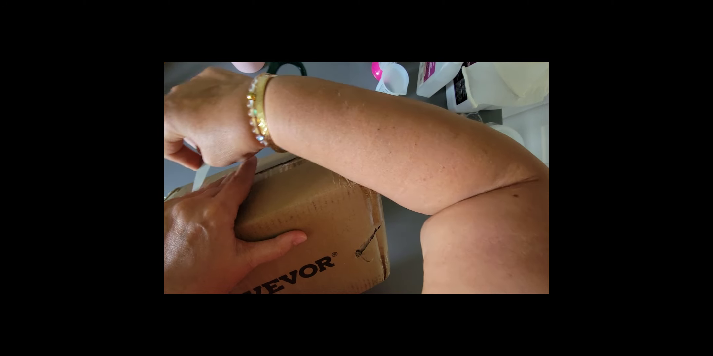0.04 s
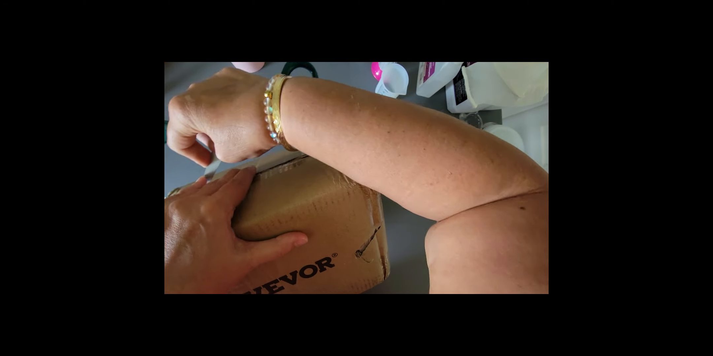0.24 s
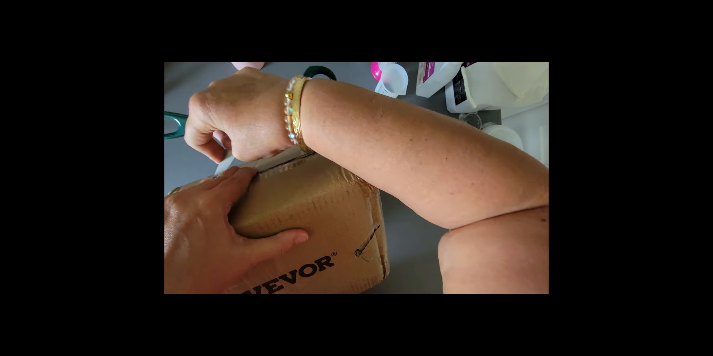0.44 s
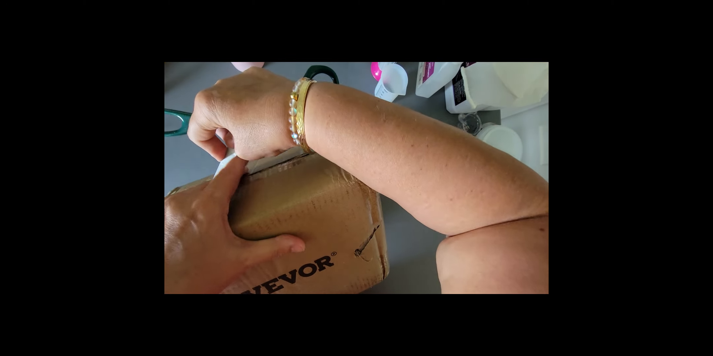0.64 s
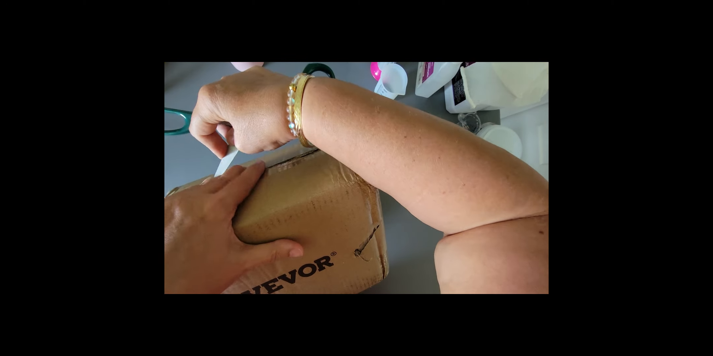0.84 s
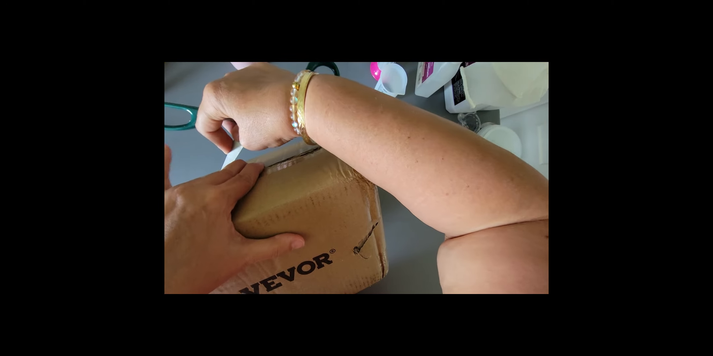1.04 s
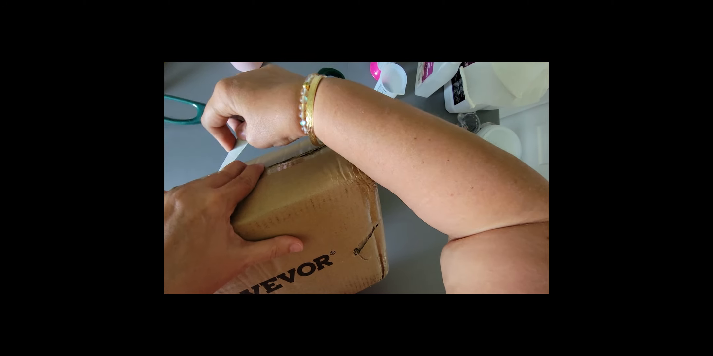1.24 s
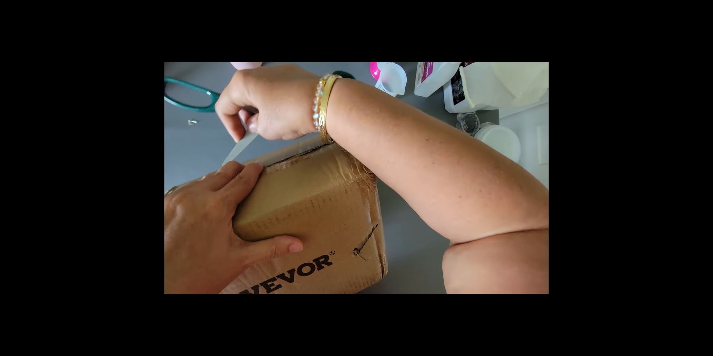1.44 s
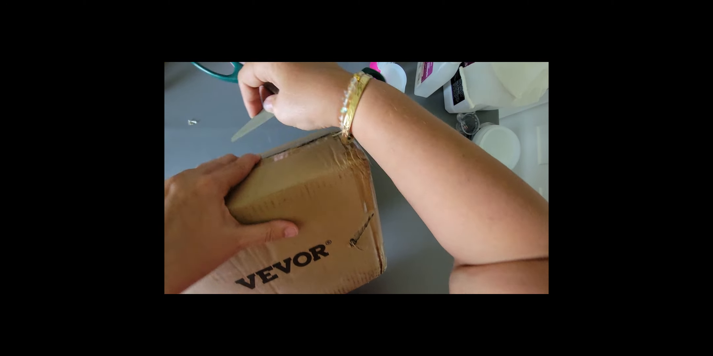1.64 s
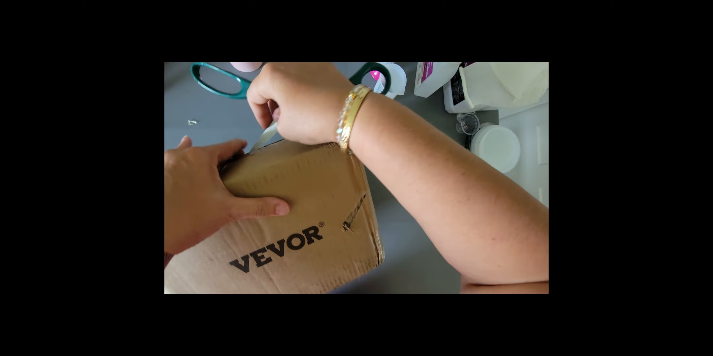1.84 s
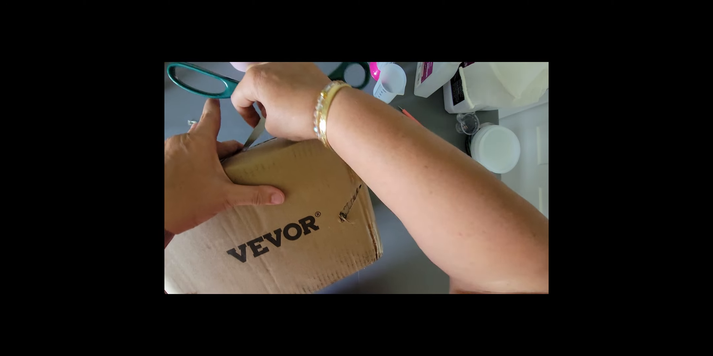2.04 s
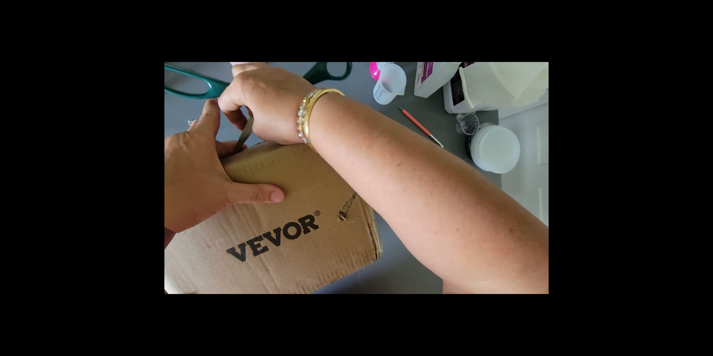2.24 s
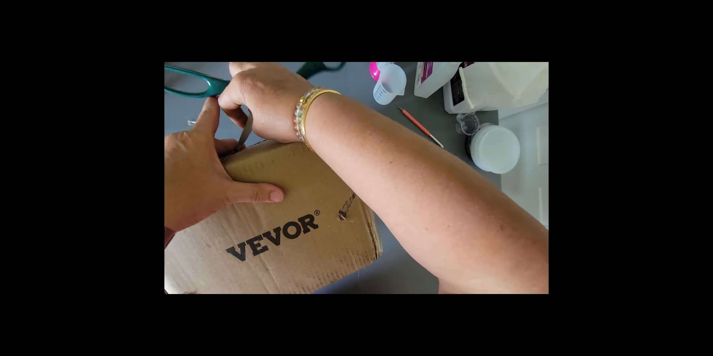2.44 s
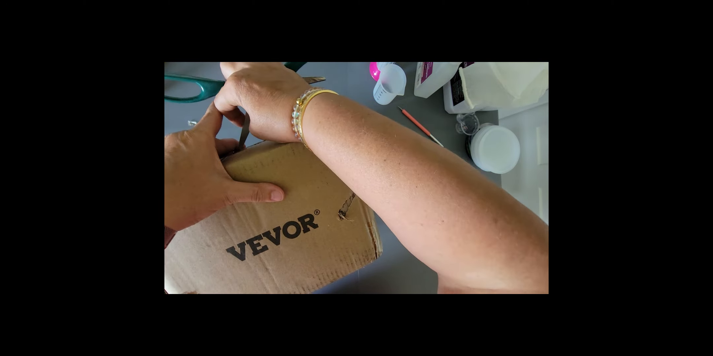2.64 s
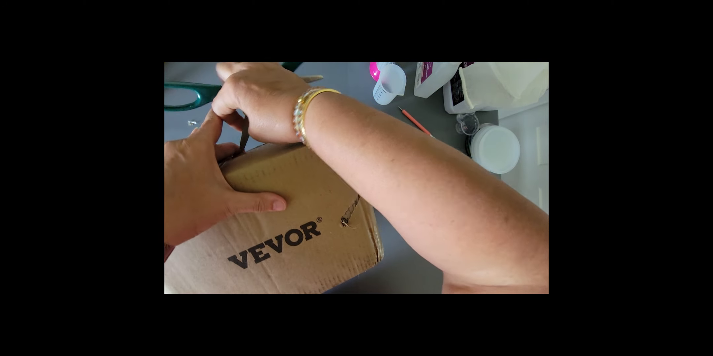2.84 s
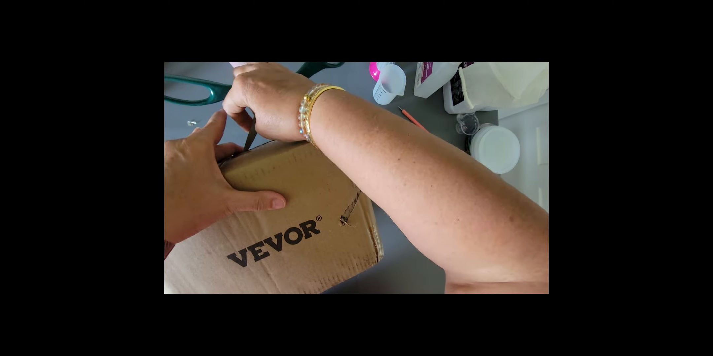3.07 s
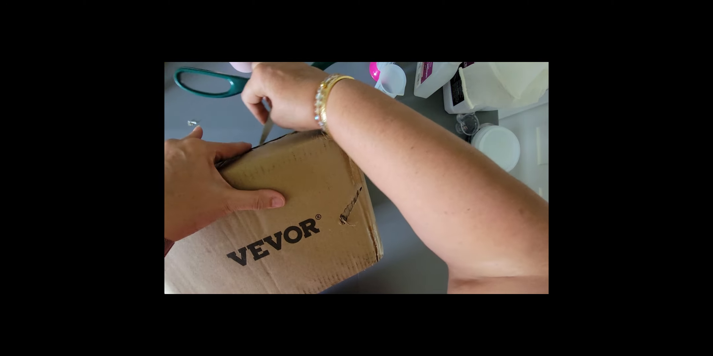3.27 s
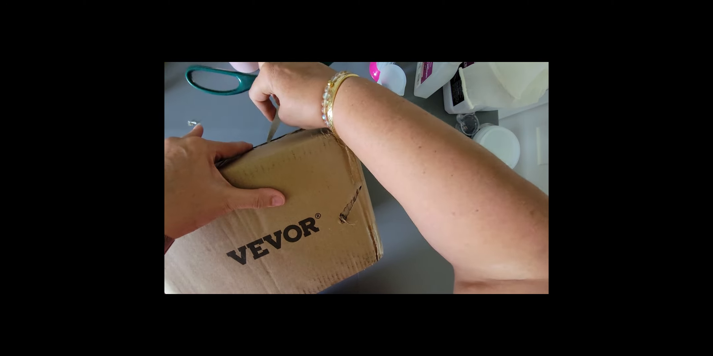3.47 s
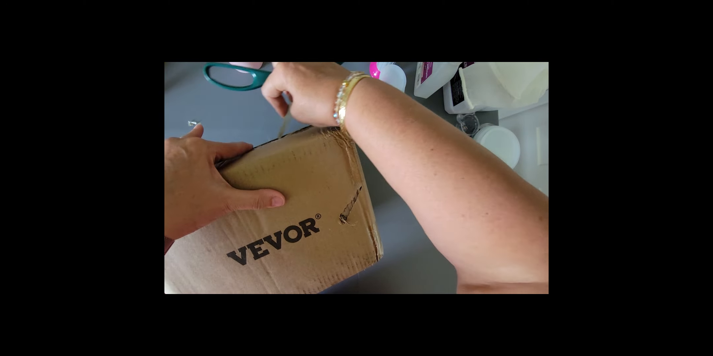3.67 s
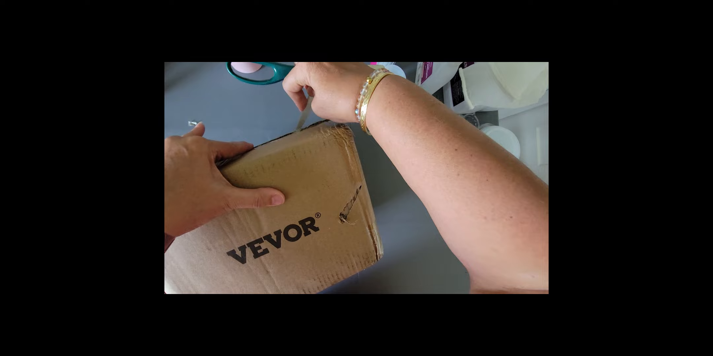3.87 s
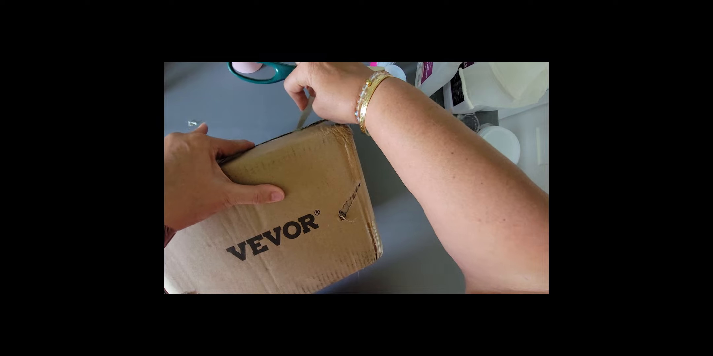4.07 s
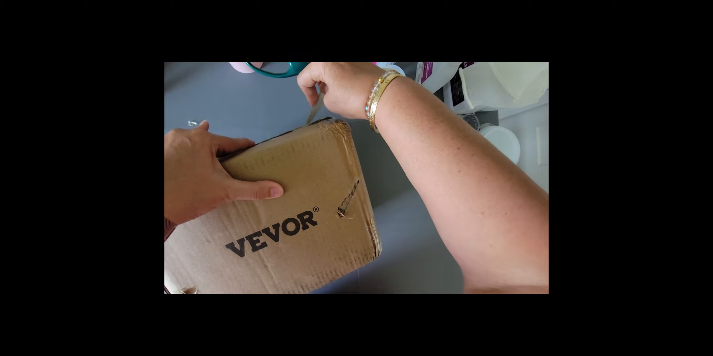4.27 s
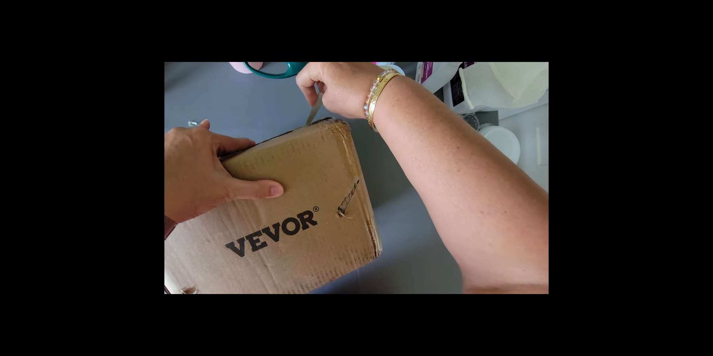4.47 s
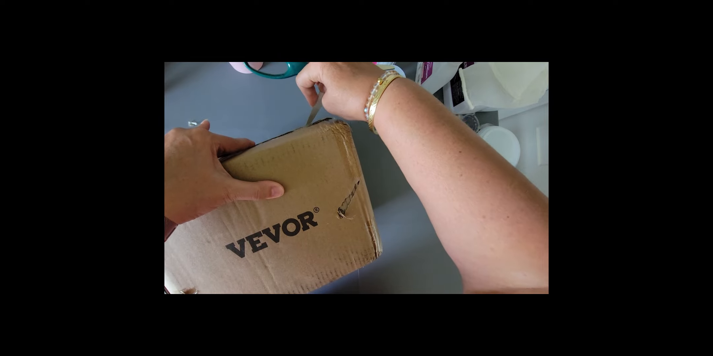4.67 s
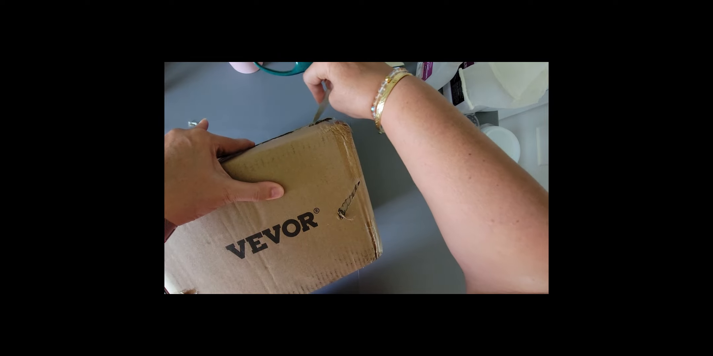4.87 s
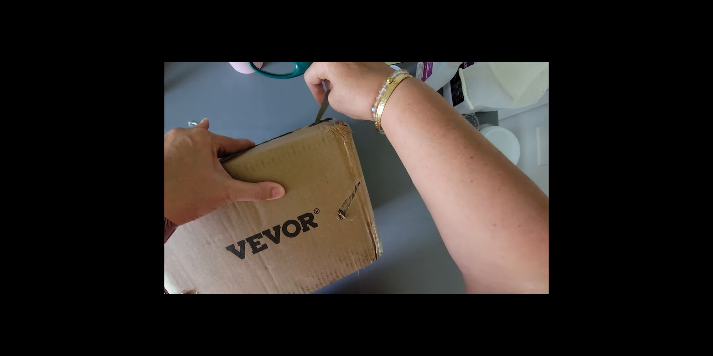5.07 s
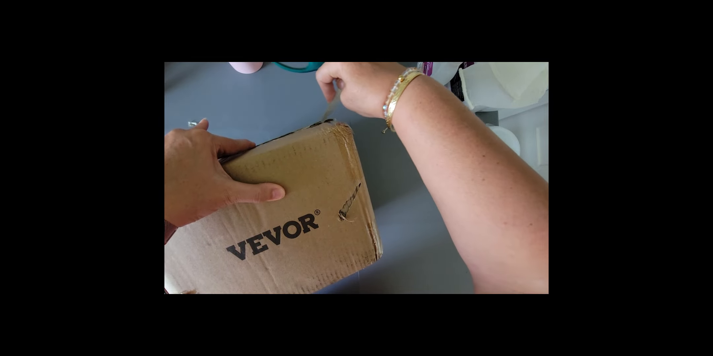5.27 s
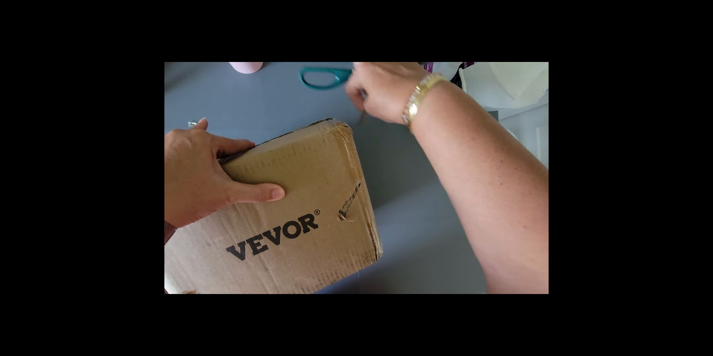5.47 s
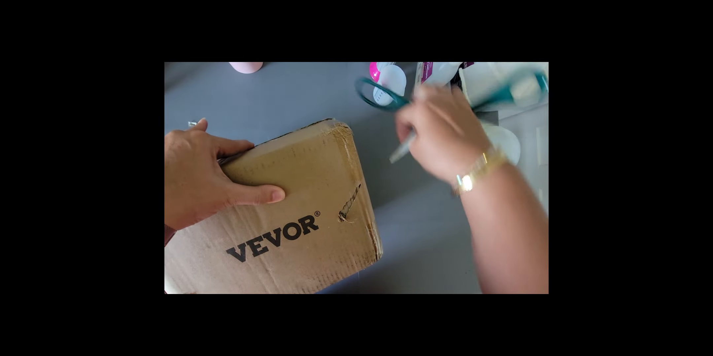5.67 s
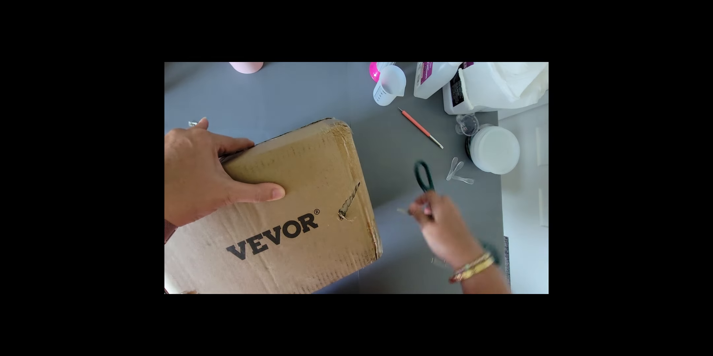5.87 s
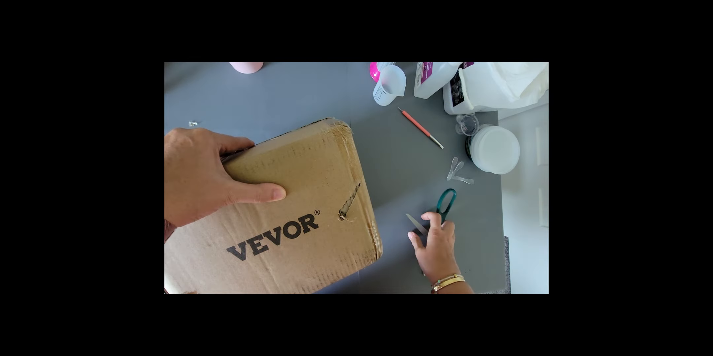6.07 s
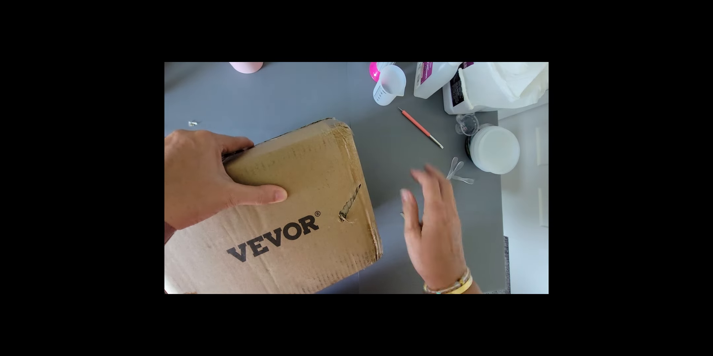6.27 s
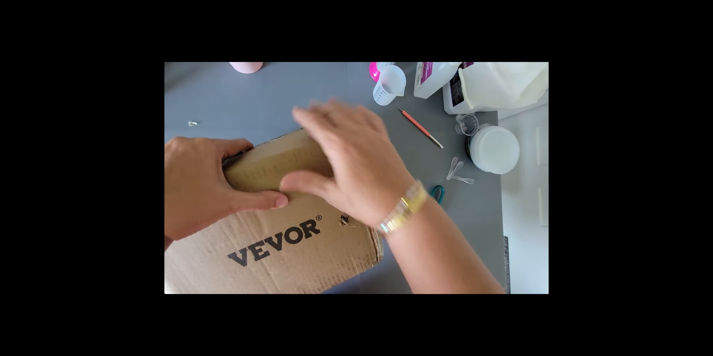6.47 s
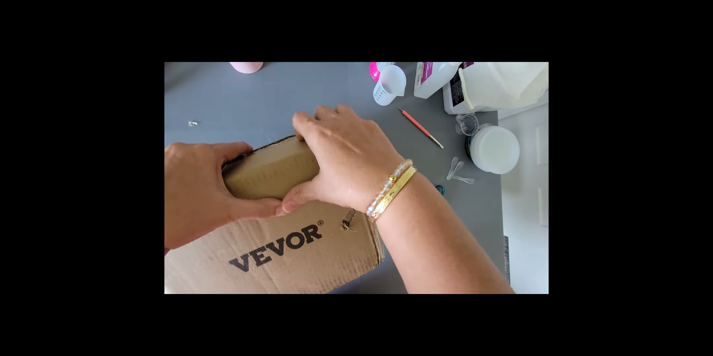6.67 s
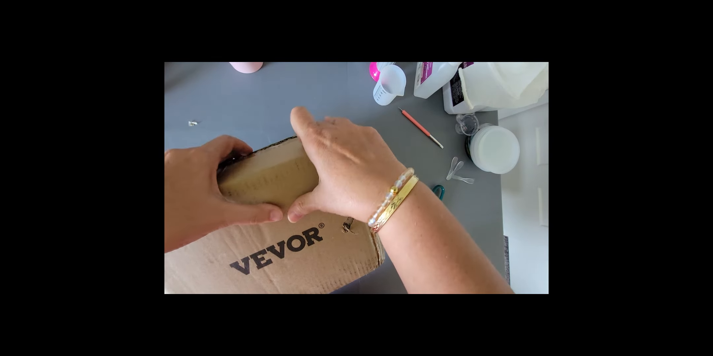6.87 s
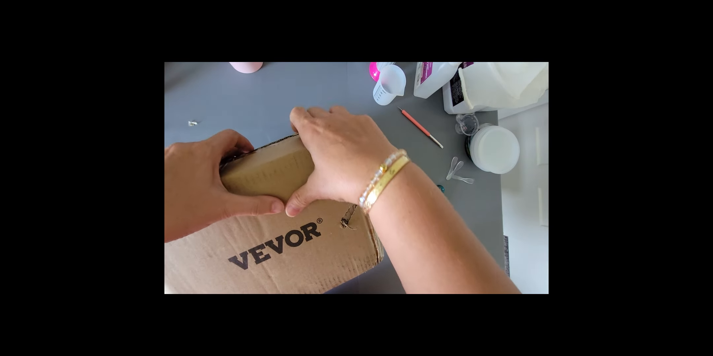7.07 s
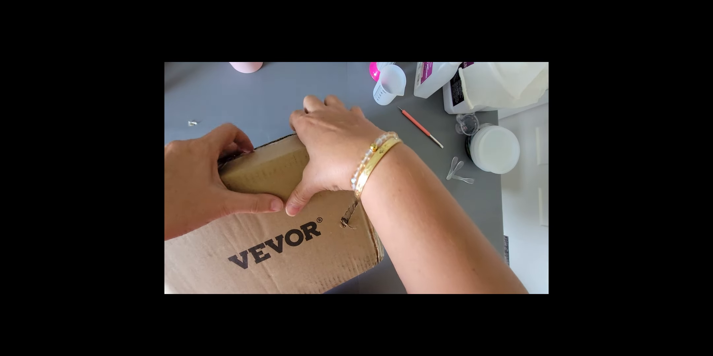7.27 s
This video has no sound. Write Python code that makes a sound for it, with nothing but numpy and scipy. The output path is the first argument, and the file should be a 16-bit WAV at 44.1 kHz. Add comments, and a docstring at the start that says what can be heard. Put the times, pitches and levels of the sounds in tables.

```python
"""A cardboard box on a table in a small room, heard close on a stereo pair over a low rumble.
A little to the left, a scissor blade works along the taped seam: it rasps and creaks through the board,
tape and fibres snap, and the panels flex and thump. At 6 s the scissors drop on the table to the right
and bounce with a steel clatter. Then, on the left again, hands rub and grip the box."""
import sys
import numpy as np
from scipy import signal
from scipy.fft import rfft, irfft
from scipy.io import wavfile
from scipy.ndimage import uniform_filter1d

SR = 44100
rng = np.random.default_rng(int(sys.argv[2]) if len(sys.argv) > 2 else 0)


def output_pcm(signal):
    """Save a mono or channel-first signal as 16-bit PCM at the path in sys.argv[1].

    Samples are clipped to [-1, 1] before scaling.
    """
    pcm = np.clip(np.atleast_2d(signal).T, -1, 1) * 32767
    wavfile.write(sys.argv[1], SR, np.round(pcm).astype(np.int16))


N = 322720
TIME = np.arange(N) / SR

# spectrum of the room tone: f/Hz, level/dB
ROOM_TONE_SPECTRUM = [(20, -6.5), (45, -5.5), (62, 4.5), (105, -1.5), (160, -16.5), (260, -16.5),
                      (360, -15.5), (550, -22.5), (1000, -27.5), (2000, -32.5), (4000, -36.5), (9000, -49),
                      (16000, -47)]
# decay of the room: f/Hz, t60/s
ROOM_T60 = [(100, 0.19), (350, 0.29), (1000, 0.22), (4000, 0.27), (9000, 0.23), (15000, 0.2)]

# handles and blades landing on the table: t/s, clash level/dB, knock level/dB
BOUNCES = [(6.008, -62, -49.5), (6.0223, -33, -36), (6.0715, -32, -25.5), (6.0918, -30.5, -31),
           (6.1256, -33, -38), (6.164, -30.5, -15), (6.1777, -29, -20), (6.1861, -26, -35.5),
           (6.2019, -30, -34.5), (6.2354, -32, -28)]
# spectra of the steel's clash and the table's knock: f/Hz, level/dB
CLASH_SPECTRUM = [(800, 8.5), (2000, -15.5), (2800, -2), (4200, -3.5), (5200, -2.5), (8500, 1), (10300, -4),
                  (13000, 1.5), (16000, -6)]
TABLE_SPECTRUM = [(50, -23), (110, 4.5), (230, -7.5), (340, 5), (480, -0.5), (680, -5.5), (850, 0.5),
                  (1000, -1), (1300, 0), (1700, -6.5), (2300, -9.5), (5000, -21)]
# clusters of close steel modes that colour the clash: f/Hz, width/Hz, level/dB
CLASH_CLUSTERS = [(2570, 230, 5), (4300, 170, 5.5)]
# modes of the free steel blades, and of scissors and table top together: f/Hz, level/dB, t60/s
STEEL_MODES = [(2500, -2.5, .2), (2720, 5.5, 0.13), (4306, -0.5, 0.26), (5760, -1, 0.16), (7343, -15, .25),
               (12860, -5, .18)]
TABLE_MODES = [(250, 8.5, 0.058), (338, 10, 0.1), (556, -14.5, 0.18), (735, -9.5, 0.13), (801, -3, 0.18),
               (1140, 2.5, 0.08), (1437, -8.5, 0.24), (1570, -12, 0.16), (1737, -6, 0.19), (1897, -9, 0.33)]

# fingers shifting on the taped box: from t/s, to t/s
HANDLING = [(.45, 1.55), (6.6, 7.25)]
# the blade slipping between tight board edges: t/s, slip level/dB, f/Hz
CREAKS = [(0.65, -38, 730), (1.535, -41.5, 615), (1.648, -34.5, 666), (1.685, -37, 910), (1.886, -29, 950),
          (1.91, -30.5, 930), (2.119, -45, 400), (2.158, -33.5, 440), (2.24, -34.5, 876), (2.444, -40, 603)]
# the blade or a hand sliding on the box: t/s, length/s, hiss level/dB, rasp level/dB
STROKES = [(0, 0.014, -50, -40), (0.155, 0.18, -57.5, -50), (0.484, 0.23, -69.5, -63),
           (1.128, 0.2, -71, -84), (1.515, 0.53, -70.5, -58), (2.091, 0.17, -71, -53.5),
           (2.394, 0.074, -69.5, -48.5), (2.681, 0.029, -55.5, -42), (2.973, 0.036, -61.5, -51),
           (3.121, 0.18, -50, -43), (3.494, 0.29, -59.5, -48.5), (4.079, .13, -59, -57),
           (4.769, 0.085, -58.5, -50.5), (5.002, 0.02, -58.5, -48), (5.233, 0.075, -55.5, -49),
           (5.385, 0.054, -46, -44), (6.461, 0.074, -54, -50.5), (6.586, 0.17, -62.5, -57),
           (6.959, 0.032, -48.5, -52.5), (7.242, 0.078, -70, -49)]
# tape and single fibres snapping: t/s, crack level/dB, tick level/dB, knock level/dB
SNAPS = [(0.1628, -45.5, -43.5, -53), (.193, -30, -42, -42.5), (0.335, -37, -46, -37.5),
         (0.649, -52, -52, -56), (.959, -48.5, -58, -42.5), (2.697, -38, -47, -40), (1.778, -52, -54, -51),
         (3.271, -39, -64, -30.5), (3.537, -36.5, -56, -33), (3.639, -52.5, -55, -39),
         (5.2014, -48.5, -55, -59), (5.3445, -35, -70, -33), (5.435, -38.5, -54, -35),
         (6.804, -37.5, -59, -44), (7.255, -45.5, -68.5, -51)]
# the board giving way under the blade or a hand: t/s, tear length/s, crack level/dB, tick level/dB,
# blade level/dB, knock level/dB, thump level/dB, panel f/Hz
BREAKS = [(.829, 0.0014, -44, -56, -72, -35.5, -22.5, 138), (1.842, .003, -42, -72, -51, -28, -26, 150),
          (3.212, 0.0061, -33.5, -50, -44, -28.5, -22.5, 118),
          (3.3, 0.0022, -39, -57, -50, -33.5, -19, 184), (3.674, .006, -47, -50.5, -58, -38, -26, 160),
          (3.7929, .002, -32, -37.5, -56, -25.5, -26.5, 192),
          (3.8316, 0.0015, -43.5, -46, -54, -26.5, -26, 93.5),
          (4.15, 0.0042, -34.5, -38.5, -47, -28, -17.5, 143),
          (4.202, 0.0074, -40, -46, -44, -26.5, -14, 186.5), (4.799, 0.0026, -49, -52, -40, -41, -22, 197),
          (4.945, 0.0049, -53, -59.5, -44, -37, -25.5, 147), (5.273, 0.011, -45, -48.5, -39, -33, -24, 222),
          (5.4039, 0.0034, -29, -46, -31, -25.5, -22, 138), (6.488, 0.0053, -42, -62, -54, -33, -18, 86),
          (6.735, .003, -56, -59, -67, -48, -23.5, 192)]
# spectra of the edge's hiss, the board's rasp, a crack and the tape film's tick: f/Hz, level/dB
HISS_SPECTRUM = [(700, -2.5), (2000, 3), (3000, -1.5), (4200, 0), (5200, -3.5), (8000, -6), (11000, -14),
                 (16000, -15)]
RASP_SPECTRUM = [(50, -17.5), (110, 8), (190, 4.5), (280, 1.5), (380, 4), (520, -3), (750, -4),
                 (1100, -6.5), (1700, -9.5), (2600, -23), (6000, -45)]
CRACK_SPECTRUM = [(600, -23.5), (1500, 3.5), (2100, -3), (2850, -4.5), (3400, -4.5), (4200, -5),
                  (5200, -8.5), (9000, -22.5), (14000, -34)]
TICK_SPECTRUM = [(3000, -25), (6000, 0), (10000, -5.5), (14000, -6), (19000, -16)]
# modes of the box, and of the cutting blade damped by the hand: f/Hz, level/dB, t60/s
BOX_MODES = [(349.3, 1, 0.044), (539, -11.5, 0.11), (756, -11, 0.092), (780, 6.5, 0.0062),
             (1100, 3.5, 0.014), (1500, 9, 0.001), (1640, 7, 0.0034)]
HELD_BLADE_MODES = [(2745, -1, 0.044), (4080, -29, .035), (5340, -10, 0.023)]
# resonance of the box's hollow: f/Hz, width/Hz, level/dB
HOLLOW = (330, 14, 1)


def from_db(db):
    """Decibels to gain."""
    return 10 ** (np.asarray(db) / 20)


def unit_rms(x):
    """Scale to unit rms."""
    return x / np.sqrt(np.mean(x ** 2) + 1e-20)


def at_hz(points, hz):
    """Read a table on a log-frequency axis."""
    freq, value = np.transpose(points)
    return np.interp(np.log(np.maximum(hz, 1)), np.log(freq), value)


def fade(t, t60):
    """Exponential decay by 60 dB in t60 seconds."""
    return np.exp(-np.log(1000) * t / t60)


def damped_sine(t, hz, t60):
    """One mode ringing out."""
    return np.sin(2 * np.pi * hz * t) * fade(t, t60)


def add(track, s, sound):
    """Mix a sound into a track from s seconds on."""
    start = max(round(s * SR), 0)
    track[start:start + len(sound)] += sound[:N - start]


def low_cut(x, hz, order):
    """Roll off everything below hz."""
    return signal.sosfilt(signal.butter(order, hz, "high", fs=SR, output="sos"), x)


def colour(x, spectrum, size=4096):
    """Minimum-phase filter with the spectrum's shape; white noise keeps its power."""
    gain = unit_rms(from_db(at_hz(spectrum, np.fft.rfftfreq(size, 1 / SR))))
    cepstrum = irfft(np.log(gain))[:size // 2]
    cepstrum[0] /= 2
    response = irfft(np.exp(rfft(2 * cepstrum, size)))
    return signal.oaconvolve(x, response)[:N]


def resonate(x, hz, width_hz, db):
    """A single resonance with a gain of db at its peak."""
    radius = np.exp(-np.pi * width_hz / SR)
    feed = np.array([1, 0, -1]) * (1 - radius ** 2) / 2
    feedback = [1, -2 * radius * np.cos(2 * np.pi * hz / SR), radius ** 2]
    return from_db(db) * signal.lfilter(feed, feedback, x + 1e-18)


def drift(per_s):
    """Random wandering with unit rms."""
    knots = np.arange(0, N / SR + 1, 1 / per_s)
    return unit_rms(np.interp(TIME, knots, rng.standard_normal(N)[:len(knots)]))


def burst(t60, tail_db, tail_t60, size=16384):
    """A sharp spray of tiny contacts with a weaker, longer tail."""
    t = TIME[:size]
    return rng.standard_normal(size) * (fade(t, t60) + from_db(tail_db) * fade(t, tail_t60))


def strike(modes, spread_db, detune, size=16384):
    """One blow on a body: the contact point changes each mode's strength, sign and pitch."""
    hz, db, t60 = np.transpose(modes)[:, :, None]
    strength = from_db(db + spread_db * rng.standard_normal(hz.shape)) * rng.choice([-1, 1], hz.shape)
    pitch = hz * (1 + detune * rng.standard_normal(hz.shape))
    return np.sum(strength * damped_sine(TIME[:size], pitch, t60), axis=0)


def direct_at_mics(x, left_lead_s, left_db):
    """The nearer microphone hears a source earlier and louder."""
    lead = round(left_lead_s * SR / 2)
    return np.array([from_db(left_db / 2) * np.roll(x, -lead), from_db(-left_db / 2) * np.roll(x, lead)])


def diffuse_at_mics(mid, side):
    """Diffuse bass reaches both microphones alike; the treble is wide."""
    side = low_cut(side, hz=480, order=1)
    return np.array([mid + side, mid - side]) / np.sqrt(2)


def room_tone():
    """A steady low rumble all around the microphones."""
    mid, side = (colour(noise, ROOM_TONE_SPECTRUM) for noise in rng.standard_normal((2, N)))
    return from_db(-56) * diffuse_at_mics(mid, side)


def early_reflections(size, count=4):
    """Near surfaces: a chain of allpass echoes smears a sound without colouring it."""
    hz = np.fft.rfftfreq(size, 1 / SR)
    delays_s = rng.uniform(0.0006, 0.0035, (count, 1))
    echo = np.exp(-2j * np.pi * hz * delays_s)
    allpasses = (echo - 0.6) / (1 - 0.6 * echo)
    return irfft(echo[0] * np.prod(allpasses, axis=0))


def room(x, tail_db, early_db, size=24576):
    """The small room answers with early reflections and a short tail, each octave at its own decay."""
    t, centres_hz = TIME[:size], 125 * 2. ** np.arange(8)
    octave = np.log2(np.maximum(np.fft.rfftfreq(size, 1 / SR), 1))
    white = rfft(rng.standard_normal((2, size)))
    tail = np.zeros((2, size))
    for hz, share in zip(centres_hz, np.eye(len(centres_hz))):
        band = irfft(white * np.interp(octave, np.log2(centres_hz), share))
        tail += band * fade(t, at_hz(ROOM_T60, hz))
    build_up = 1 - fade(t, t60=0.28)
    tail = unit_rms(tail * build_up) / np.sqrt(size)
    early = np.array([early_reflections(size), early_reflections(size)])
    response = from_db(tail_db) * tail + from_db(early_db) * early
    return diffuse_at_mics(*signal.oaconvolve(x[None], response, axes=1)[:, :N])


def tape_crinkles(per_s=22, count=200):
    """The tape ticks faintly at random while the fingers shift; the thin film radiates only treble."""
    ticks, t = np.zeros(N), TIME[:1024]
    times = np.cumsum(rng.exponential(1, count)) / per_s
    levels_db = rng.normal(-57, 2, count)
    for s, db, spray in zip(times, levels_db, rng.standard_normal((count, len(t)))):
        if any(start < s < end for start, end in HANDLING):
            add(ticks, s, from_db(db) * spray * fade(t, t60=0.008))
    return low_cut(ticks, hz=3930, order=2)


def board_creaks(slips_per_creak=3, max_gap_s=0.002115, pitch_spread=0.16):
    """A creak is a few quick slips, each flicking the board's edge and sounding the hollow."""
    slips, t = np.zeros(N), TIME[:2048]
    for s, db, hz in CREAKS:
        for delay in np.cumsum(rng.uniform(0, max_gap_s, slips_per_creak)):
            pitch = hz * np.exp(pitch_spread * rng.standard_normal())
            add(slips, s + delay, from_db(db) * damped_sine(t, pitch, t60=0.0073))
    return slips + resonate(slips, HOLLOW[0], width_hz=17, db=9.5)


def fibre_friction(per_s, spread_db, clump_db, smooth_db):
    """Fibres catch at random, in clumps, over smooth friction noise; loudness is evened over 25 ms."""
    sizes = from_db(spread_db * np.minimum(rng.exponential(1, N), 4)) * rng.choice([-1, 1], N)
    catches = unit_rms(sizes * (rng.random(N) < per_s / SR))
    smooth = from_db(smooth_db) * rng.standard_normal(N)
    rough = (catches + smooth) * from_db(clump_db * drift(per_s=130))
    local_power = uniform_filter1d(rough ** 2, size=1100)
    return rough / np.sqrt(local_power + 1e-9)


def scraping(attack_share=0.19):
    """Each stroke takes hold, holds and lets go, hissing at the edge and rasping through the board."""
    hiss, rasp = np.zeros((2, N))
    t = TIME[:SR]
    for s, length, hiss_db, rasp_db in STROKES:
        attack = np.minimum(t / (attack_share * length), 1) ** 2
        push = attack * fade(np.maximum(t - length, 0), t60=0.056)
        add(hiss, s, from_db(hiss_db) * push)
        add(rasp, s, from_db(rasp_db) * push)
    for s, *_, knock_db, _, _ in BREAKS:
        add(rasp, s, from_db(knock_db - 5) * fade(t, t60=0.03))   # the skid after a break
    hiss *= fibre_friction(per_s=710, spread_db=3.5, clump_db=7, smooth_db=-1.5)
    rasp *= fibre_friction(per_s=460, spread_db=5.5, clump_db=13, smooth_db=0.5)
    edge, board = colour(hiss, HISS_SPECTRUM), colour(rasp, RASP_SPECTRUM)
    blade = resonate(edge, HELD_BLADE_MODES[0][0], width_hz=250, db=-9)
    return edge + board + blade + resonate(board, *HOLLOW)


def snapping(size=6144):
    """Each break or snap tears with a crack and a thin tick, knocks the board and rings the blade."""
    cracks, ticks, knocks, blade = np.zeros((4, N))
    t = TIME[:size]
    lead_in = from_db(-15.5) * fade(t[:1024], t60=0.049)[::-1]
    knock_rise = 1 - fade(t, t60=0.0048)
    fractures = [row[:6] for row in BREAKS]
    # a snap tears at once and barely rings the blade
    fractures += [(s, 0.0011, db, tick_db, db - 19, knock_db) for s, db, tick_db, knock_db in SNAPS]
    for s, tear_s, crack_db, tick_db, blade_db, knock_db in fractures:
        tear = np.concatenate([lead_in, fade(np.maximum(t - tear_s, 0), t60=0.0097)])
        start = s - len(lead_in) / SR
        add(cracks, start, from_db(crack_db) * tear * rng.standard_normal(len(tear)))
        add(ticks, start, from_db(tick_db) * tear * rng.standard_normal(len(tear)))
        knock = strike(BOX_MODES, spread_db=0, detune=0.038, size=size)
        ring = strike(HELD_BLADE_MODES, spread_db=1.5, detune=0.0067, size=size)
        add(knocks, s, from_db(knock_db) * knock * knock_rise)
        add(blade, s, from_db(blade_db) * ring)
    return colour(cracks, CRACK_SPECTRUM) + colour(ticks, TICK_SPECTRUM) + knocks + blade


def panel_thumps(lag_s=0.00341):
    """Just after each break the panel and the whole box swing a few cycles and sound the hollow."""
    swings, t = np.zeros(N), TIME[:8192]
    whole_box = from_db(-16.5) * damped_sine(t, hz=105, t60=0.06)
    rise = 1 - fade(t, t60=0.002)
    for s, *_, db, hz in BREAKS:
        panel = damped_sine(t, hz, t60=0.037)
        overtone = from_db(-15) * damped_sine(t, 1.93 * hz, t60=0.015)
        add(swings, s + lag_s, from_db(db) * (panel + whole_box - overtone) * rise)
    thumps = low_cut(swings, hz=62, order=3)
    return thumps + resonate(thumps, hz=358, width_hz=26, db=3)


def dropped_scissors(mode_count=70):
    """Steel and plastic bounce on the table: a clash of many high modes, a hollow knock, a short ring."""
    clash, knock, ring = np.zeros((3, N))
    t = TIME[:12288]
    steel_hz = rng.uniform(2400, 16000, (mode_count, 1))
    dense_modes = damped_sine(t, steel_hz, t60=0.2) / np.sqrt(mode_count)
    for s, clash_db, knock_db in BOUNCES:
        add(clash, s, from_db(clash_db) * burst(t60=0.048, tail_db=-10.5, tail_t60=0.3))
        first_contact = rng.standard_normal(len(t)) * fade(t, t60=0.013)
        add(clash, s, from_db(clash_db + 0.5) * first_contact)
        add(clash, s, from_db(clash_db - 18) * (rng.standard_normal(mode_count) @ dense_modes))
        add(knock, s, from_db(knock_db) * burst(t60=0.019, tail_db=-17.5, tail_t60=0.46))
        add(ring, s, from_db(knock_db - 13) * strike(TABLE_MODES, spread_db=0.5, detune=0.0024))
        add(ring, s, from_db(clash_db - 21.5) * strike(STEEL_MODES, spread_db=4, detune=0.0033))
    clusters = sum(resonate(clash, *cluster) for cluster in CLASH_CLUSTERS)
    metal = colour(clash + clusters, CLASH_SPECTRUM)
    return low_cut(metal + colour(knock, TABLE_SPECTRUM) + ring, hz=60, order=2)


def scene():
    """From the microphones: the box lies to the left, the scissors land to the right."""
    scrapes = scraping()
    snaps = snapping() + board_creaks() + tape_crinkles()
    thumps = panel_thumps()
    box = direct_at_mics(scrapes + snaps + thumps, left_lead_s=0.00029, left_db=3.5)
    echoes = room(scrapes, tail_db=-4.5, early_db=-2)
    echoes += room(snaps, tail_db=-8.5, early_db=-5.5)
    echoes += room(thumps, tail_db=-3, early_db=-11)
    # the tumbling scissors radiate differently to the microphones and to the walls
    scissors = direct_at_mics(dropped_scissors(), left_lead_s=-0.00054, left_db=-3)
    echoes += room(dropped_scissors(), tail_db=-5, early_db=2.5)
    return room_tone() + echoes + box + scissors


def record(dry):
    """The recorder cuts the treble steeply above 15.8 kHz."""
    return signal.sosfilt(signal.ellip(10, 0.1, 80, 15800, fs=SR, output="sos"), dry)


dry = scene()
out = record(dry)
output_pcm(out)
```